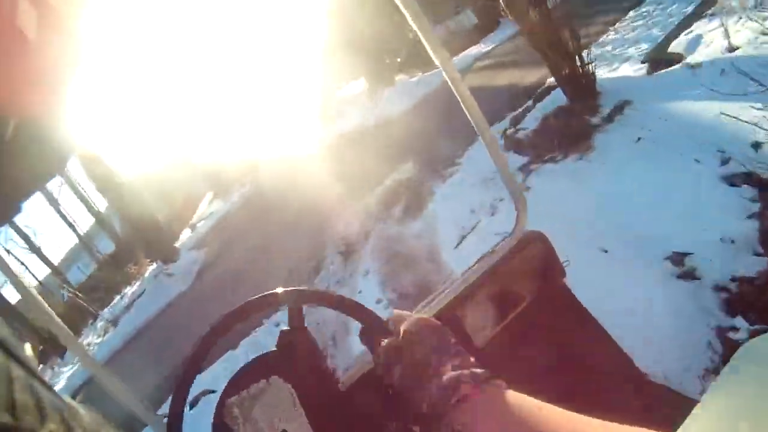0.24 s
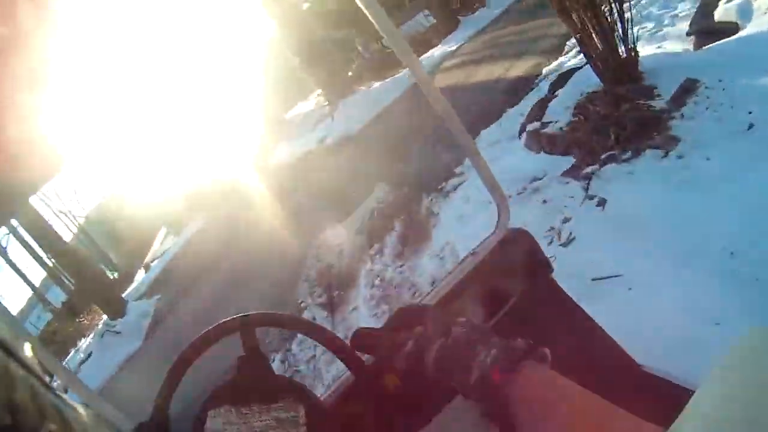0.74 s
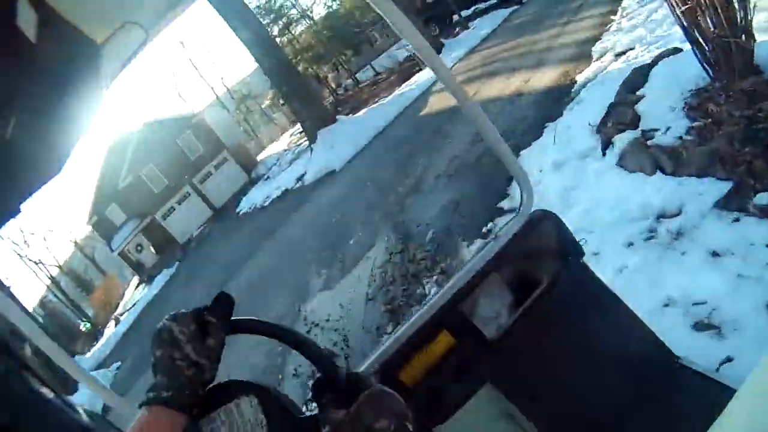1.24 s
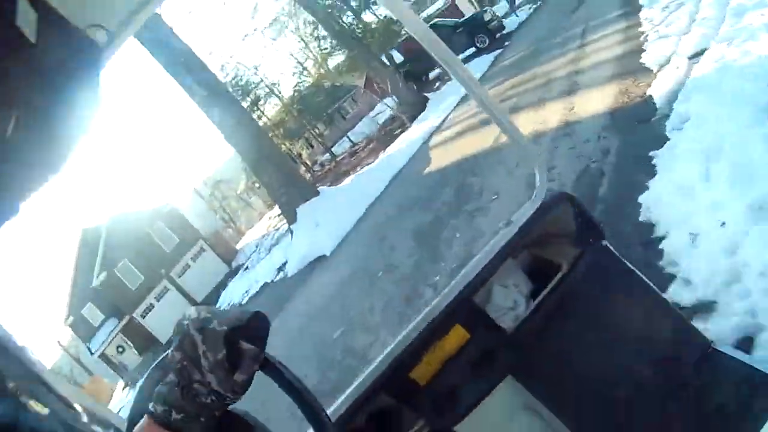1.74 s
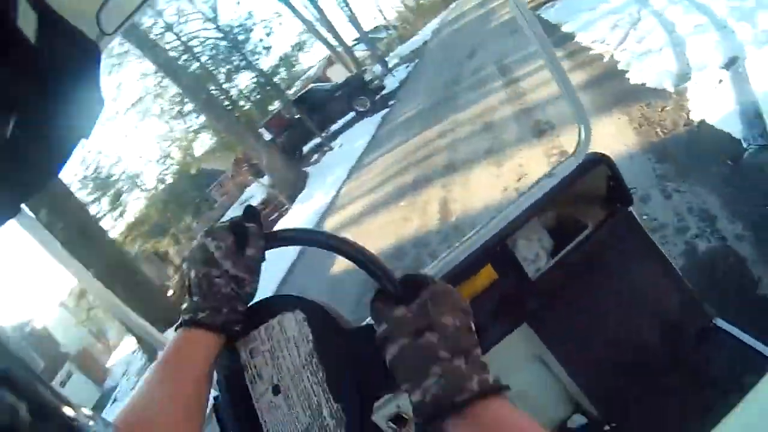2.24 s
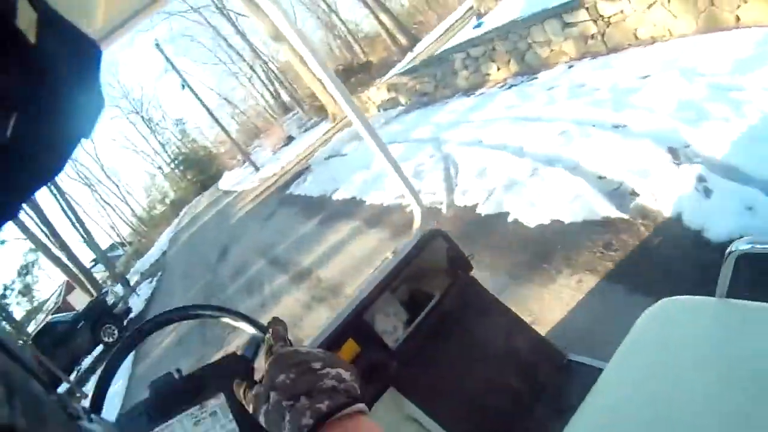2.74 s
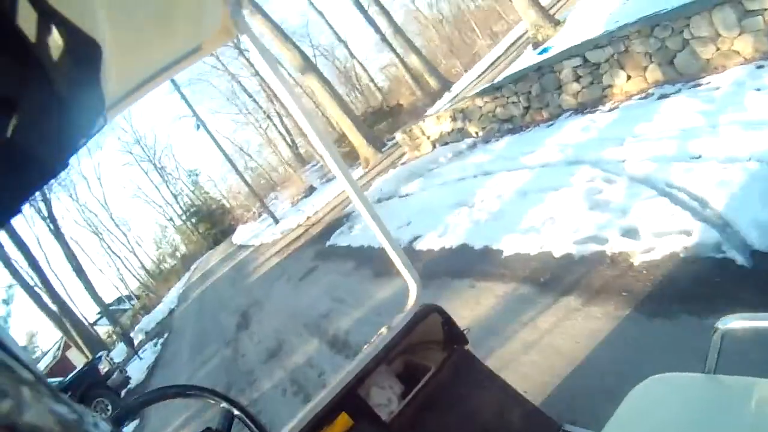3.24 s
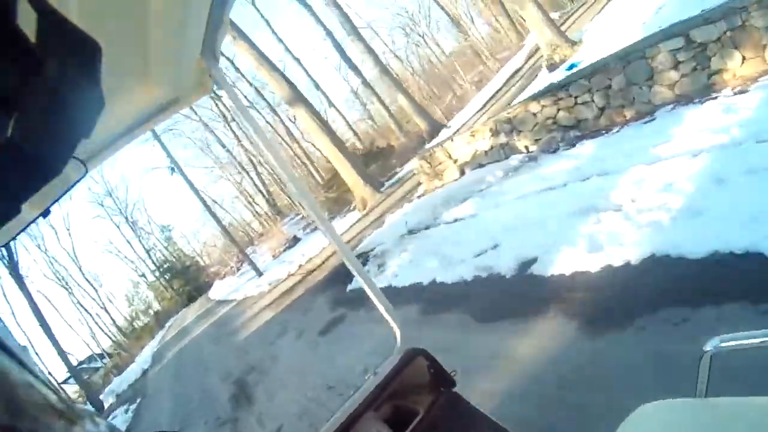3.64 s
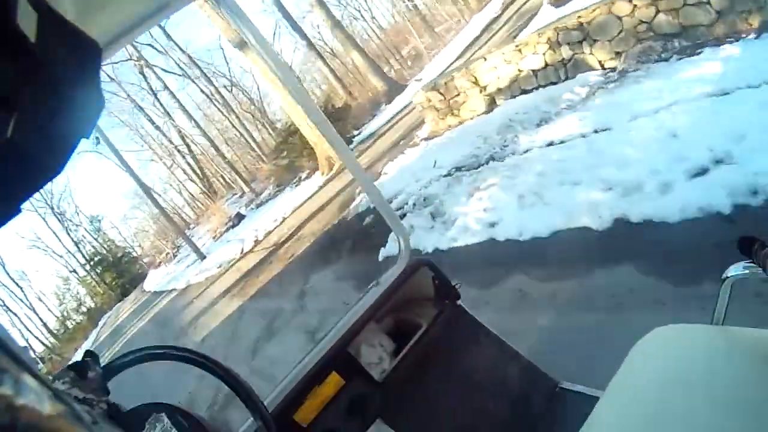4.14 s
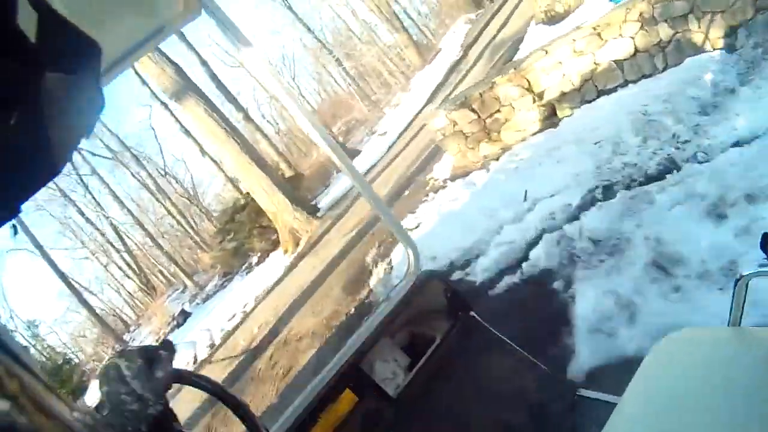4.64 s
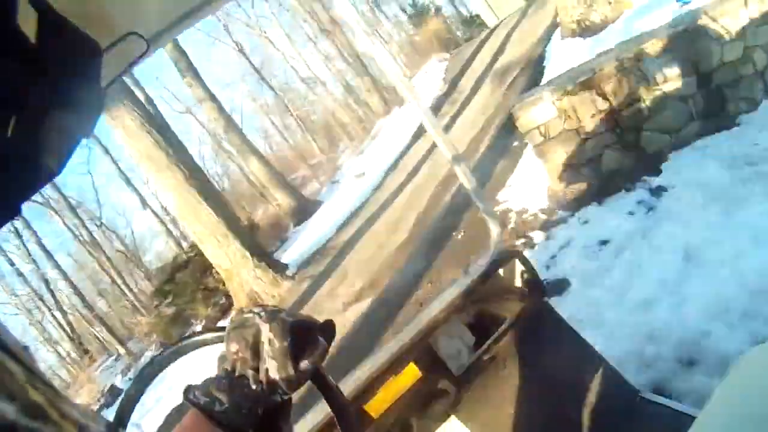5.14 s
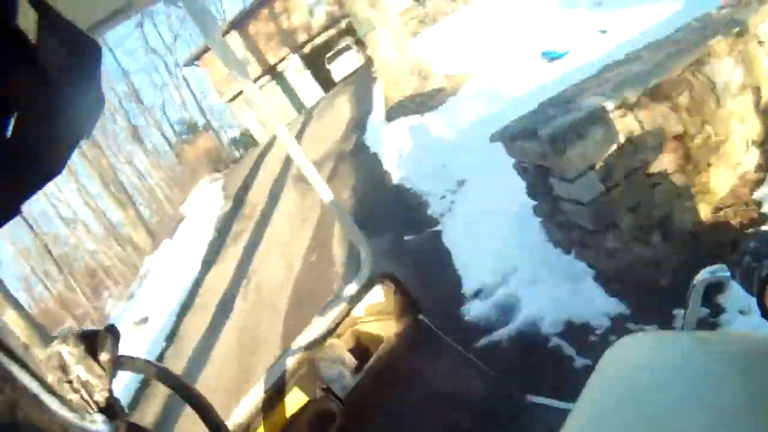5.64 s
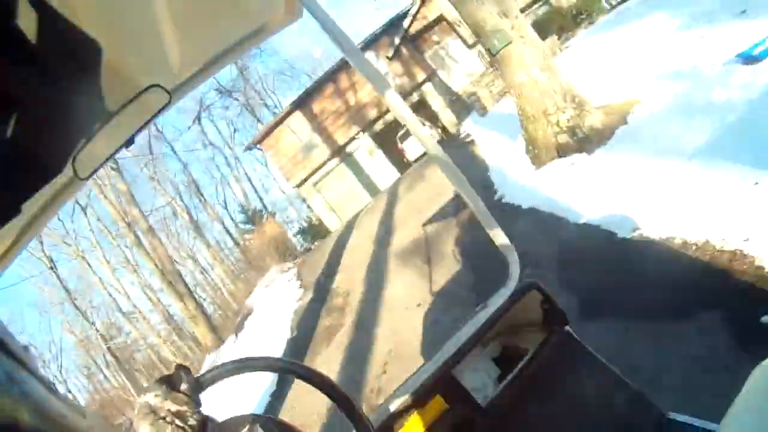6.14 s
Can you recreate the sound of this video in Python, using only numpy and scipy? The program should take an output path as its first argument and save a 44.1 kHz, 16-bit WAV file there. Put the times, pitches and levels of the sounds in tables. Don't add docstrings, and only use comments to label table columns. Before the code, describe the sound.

A small one-cylinder cart idles with slow, soft thumps, then the throttle opens and it pulls away along a driveway, shuddering and clattering. The engine eases briefly, picks up again and chugs on with uneven revs. Hard body knocks mark bumps. The muffled, cased microphone rides on board outdoors, and wind grows from almost nothing to heavy buffeting that breaks into overload.

```python
import sys
import numpy as np
from scipy import signal
from scipy.io import wavfile

SR = 44100
rng = np.random.default_rng(int(sys.argv[2]) if len(sys.argv) > 2 else 0)


def decibels_to_gain(level_db):
    exponent = np.asarray(level_db, float) / 20
    return 10 ** exponent


def store_pcm(level_fs):
    pcm = np.round(np.clip(level_fs, -1, 1) * 32767).astype(np.int16)
    wavfile.write(sys.argv[1], SR, np.atleast_2d(pcm).T)


N = 281799

# time in seconds, firing cycles per second.
CRANK_SPEED = [(0.0, 14.47), (0.32, 13.82), (0.96, 17.19), (1.28, 22.01), (1.44, 23.82), (1.76, 22.78),
               (2.08, 18.47), (2.4, 22.46), (2.72, 20.71), (3.52, 24.29), (3.68, 23.91), (3.84, 20.31),
               (4.16, 19.58), (4.96, 22.75), (5.28, 18.2), (5.76, 22.82), (5.92, 21.76), (6.39, 23.45)]
# time in seconds, peak level in dB.
THROTTLE_CURVE = [(0, -34), (.3, -34), (.56, -31), (.6, -22.5), (.97, -20), (1.05, -15), (1.55, -19.5),
                  (1.72, -25.5), (2.04, -26), (2.1, -15.5), (2.55, -18.5), (2.75, -18), (3.4, -17),
                  (3.8, -22), (4.9, -17.5), (5.25, -17), (5.6, -17), (6.39, -12.5)]
# frequency in Hz, width in Hz, level in dB.
BODY_MODES = [(380, 29, 8), (450, 89, 0), (742, 32.4, 6.5), (919, 35, 0.5), (1154, 185, -2.5),
              (1970, 200, -1.5), (2248, 166, 3.5), (2870, 600, -8)]
# frequency in Hz, density in dB per Hz.
GEAR_SPECTRUM = [(210, -28.5), (350, 1.5), (441, -5.5), (488, -3), (755, -1.5), (836, -5.5), (1180, -14.5),
                 (1700, -12), (2230, -9), (3200, -21.5), (4160, -51.5), (7040, -120)]
# frequency in Hz, width in Hz, level in dB.
METAL_LEAK = [(3640, 750, -25.5), (4670, 770, -29.5), (5220, 2400, -38), (9550, 600, -48.5)]
# middle in seconds, length in seconds, extra clatter in dB.
GRIT_PATCHES = [
    (0.0, 0.4, 3),
    (1.498, 0.2, 0.5),
    (2.136, 0.24, 4),
    (2.938, .15, -1),
    (3.851, 0.67, -2.5),
    (4.604, 0.2, 2),
    (5.367, 0.8, 1.5),
]
# peak time in seconds, peak in dB, low thud and bright tick in dB relative to it.
BODY_KNOCKS = [(0.1082, -29, -19, -38), (0.3181, -33.5, 5, -27.5), (1.0265, -18, -9, -36.5),
               (1.0324, -22, -10, -42), (1.102, -34, -4, -24), (1.157, -23.5, -25, -28),
               (1.299, -25, -10, -29), (1.662, -26, -12, -47), (1.6868, -25, 10, -37),
               (1.718, -34, 7, -19.5), (1.926, -16, -12, -33), (1.955, -20, 6, -35.5),
               (2.0518, -28.5, 3, -18), (2.1037, -14.5, -24, -34), (2.2264, -26, 4, -32.5),
               (2.3098, -24, 1, -28), (2.7774, -30, 2.5, -27.5), (3.0879, -31.5, -1, -36),
               (3.6665, -37.5, 8, -30), (4.3934, -42, -5.5, -43), (4.5975, -20.5, 12, -23),
               (4.8321, -24, 5, -46.5), (5.0602, -23.5, 15, -22), (5.2448, -19.5, -9, -33.5),
               (5.3541, -16.5, -12, -33.5), (5.3604, -18, 2.5, -35), (5.8067, -25, 8, -34),
               (5.9603, -22, 11, -33)]
# time in seconds, level in dB.
ROAD_WIND = [(0, -69), (.5, -51.5), (.95, -42.5), (1.5, -30.5), (2.0, -37), (2.6, -28), (3.6, -27.5),
             (5.2, -25.5), (5.45, -34.5), (6.39, -18)]
# frequency in Hz, density in dB per Hz.
FLUTTER_SPECTRUM = [(65, -29), (110, -2.5), (184, 1), (214, -2.5), (247, -4), (315, -5.5), (453, -9),
                    (1380, -31), (1800, -37.5), (2340, -59.5), (3960, -120)]
# middle in seconds, peak in dB, length in seconds, deep part in dB relative to the peak.
WIND_GUSTS = [(1.168, -51, 0.19, 7), (1.565, -39, 0.18, 5), (1.756, -54, 0.023, 18),
              (1.954, -26, 0.031, -9), (2.305, -20.5, .045, -10), (2.467, -26.5, 0.038, 3),
              (2.589, -22, 0.088, -10.5), (2.772, -21, 0.053, -3), (3.077, -25, 0.061, -2),
              (3.41, -22.5, 0.11, -16), (3.524, -24.5, 0.045, 9), (3.627, -23, 0.13, -11),
              (3.816, -26.5, 0.054, 0.5), (3.909, -20.5, 0.028, -6.5), (4.011, -21.5, 0.072, 4.5),
              (4.204, -20, .04, -12), (4.33, -26.5, 0.075, -1), (4.457, -16.5, .04, -11),
              (4.599, -20, 0.052, 6.5), (4.763, -21.5, 0.065, -5.5), (4.87, -23, .03, 0.5),
              (4.962, -17, 0.071, -9.5), (5.086, -16.5, 0.05, -6), (5.161, -16, 0.017, -4),
              (5.257, -24, 0.021, 7.5), (5.378, -37, 0.07, 10.5), (5.571, -26, 0.057, -1),
              (5.675, -35.5, 0.082, 13), (5.82, -40.5, .07, 11.5), (6.139, -31, 0.056, 17)]
# time in seconds, edge level in dB.
OVERLOAD_SLAPS = [(2.659, -59), (2.7784, -47), (3.079, -54), (3.4635, -49.5), (3.5249, -39.5),
                  (3.5616, -45.5), (3.652, -58), (3.9372, -34), (3.9655, -40), (4.056, -45), (4.4294, -58),
                  (4.4568, -45.5), (4.5347, -47.5), (4.602, -32.5), (4.8609, -49.5), (4.8885, -53.5),
                  (4.9168, -44), (4.948, -49.5), (4.9875, -49), (5.0041, -46.5), (5.0636, -46),
                  (5.0853, -49), (5.1334, -54), (5.153, -51), (5.217, -43.5), (6.0816, -45), (6.1114, -53),
                  (6.1567, -39), (6.3013, -56.5), (6.3453, -42.5)]

FIRST_STROKE, EXHAUST_LAG = .79, .325
GRIP_CYCLES, RUNNING_CYCLES = 17.7, 22.65
SHUDDER_S, SHUDDER_LENGTH_S = 1.3, .3
OVERLOAD = .362


def engine(crank):
    cycles_per_s = np.gradient(crank) * SR
    exhaust_db, = in_time(THROTTLE_CURVE)
    idle_gulp = decibels_to_gain(-29.0) + decibels_to_gain(exhaust_db - 3.0)
    pulling_gulp = (decibels_to_gain(-32) + decibels_to_gain(exhaust_db - 5.5)) * decibels_to_gain(1 * drift(8.3))
    intake_db = 20 * np.log10(np.where(cycles_per_s < GRIP_CYCLES, idle_gulp, pulling_gulp))
    intake = thumps(crank, intake_db, hz=155, width_hz=234)
    exhaust = thumps(crank - EXHAUST_LAG, exhaust_db, hz=129, width_hz=200)

    clutch = np.clip((cycles_per_s - 17) / 3, 0, 1)
    shake = sum(decibels_to_gain(db) * np.sin(2 * np.pi * order * crank) for order, db in [(2, -22), (3, -13.5)])
    shake = shake * decibels_to_gain(4.0 * bump(SHUDDER_S, SHUDDER_LENGTH_S))
    pipe_gain = decibels_to_gain(-14.5 + 5.5 * drift(18) - 3.5 * bump(1.02, .35))
    pipe_pulse = 1 + 0.51 * np.cos(2 * np.pi * (crank - 0.2))
    pipe = pipe_gain * pipe_pulse * np.cos(2 * np.pi * 6 * crank)
    idling = decibels_to_gain(-43.0) * np.sin(2 * np.pi * 5 * (crank + .05))
    valve = valve_knock(crank - EXHAUST_LAG, exhaust_db - 2.0)
    loaded = clutch * (valve + decibels_to_gain(exhaust_db) * (shake + pipe))
    return band(intake + exhaust, 55, 380) + loaded + idling


def thumps(crank, level_db, hz, width_hz):
    at = np.flatnonzero(np.diff(np.floor(crank)) > 0)
    puffs = np.zeros(N)
    puffs[at] = decibels_to_gain(level_db[at] + 1.2 * rng.standard_normal(len(at)))
    s = np.arange(-2000, 2001) / SR
    shape = np.cos(2 * np.pi * hz * s) * np.exp(-(width_hz * s) ** 2)
    window = np.hanning(len(s))
    shape = shape - shape.sum() / window.sum() * window
    swell = np.exp(-s / 0.0056) * (1 - np.exp(-s / 0.009)) * (s > 0)
    ring = -np.sin(2 * np.pi * hz * .9 * s) * swell
    return signal.fftconvolve(puffs, shape + 0.12 * ring, "same")


def valve_knock(crank, level_db):
    clicks = np.diff(np.floor(crank), prepend=0) * decibels_to_gain(level_db)
    return sum(decibels_to_gain(db) * resonance(resonance(clicks, hz, width), hz, width)
               for hz, width, db in [(356, 61, 37.6), (758, 64, 34.6)])


def clatter(crank):
    cycles_per_s = np.gradient(crank) * SR
    faster = cycles_per_s - RUNNING_CYCLES
    belt_db = 3.5 * (np.clip((cycles_per_s - GRIP_CYCLES) * 2, 0, 1) - 1)
    grit_db = sum(db * bump(s, length) for s, length, db in GRIT_PATCHES)
    level_db = -39.5 + 0.75 * faster + grit_db + belt_db

    pulsed = np.clip(0.34 + 0.021 * faster + .4 * bump(SHUDDER_S, SHUDDER_LENGTH_S), 0, 1)
    since = (crank - EXHAUST_LAG - .08) % 1
    burst = rms_one(np.exp(-since / 0.61) + 0.5 * np.exp(-((since + .5) % 1) / 0.053))
    gate = (1 - pulsed) + pulsed * burst * decibels_to_gain(1.3 * drift(12))

    hardness = decibels_to_gain(5.0 * np.minimum(rng.exponential(1, N), 4))
    ticks = (rng.random(N) < 160 / SR) * hardness * rng.choice([-1, 1], N)
    rattle, *metal = gate * rng.standard_normal((1 + len(METAL_LEAK), N))
    peaks = rms_one(body(rattle + 3.55 * ticks))
    broad = gate * coloured(GEAR_SPECTRUM, 1.4 * drift(4.2), patchy_db=0.5, rate=13)
    thin = 0
    for noise, (hz, width, db) in zip(metal, METAL_LEAK):
        ringing = resonance(resonance(noise, hz, width), hz, width)
        thin = thin + decibels_to_gain(db + 0.04 * faster + 1.0 * drift(4.2)) * ringing
    cased = muffled(decibels_to_gain(4.0) * peaks + decibels_to_gain(2.5) * broad, cut_hz=3110)
    return decibels_to_gain(level_db) * (cased + decibels_to_gain(18.5) * thin)


def knocks():
    crack, thud, tick = np.zeros((3, N))
    s = np.arange(2000) / SR
    noise = rng.standard_normal((len(BODY_KNOCKS), 2, 2000))
    for (when, db, low_db, high_db), (bright, dull) in zip(BODY_KNOCKS, noise):
        at = round((when - .0025) * SR)
        contact = np.where(s == 0, 9.0, bright)
        crack[at:at + 2000] += decibels_to_gain(db) * contact * np.exp(-s / 0.0094)
        tick[at:at + 2000] += decibels_to_gain(db + high_db) * contact * np.exp(-s / 0.01)
        thud[at:at + 2000] += decibels_to_gain(db + min(low_db, 3)) * dull * np.exp(-s / 0.0068)
    ring = decibels_to_gain(2.5) * body(crack) + decibels_to_gain(-5.5) * band(crack, 800, 2100) + decibels_to_gain(8.5) * band(thud, 200, 1300)
    return muffled(ring, cut_hz=4100) + decibels_to_gain(-6.0) * band(tick, 4600, 11000)


def wind():
    steady = decibels_to_gain(in_time(ROAD_WIND)[0])
    sharp = steady + sum(decibels_to_gain(db) * bump(s, length) for s, db, length, deep_db in WIND_GUSTS)
    deep = sum(decibels_to_gain(db + deep_db) * bump(s, length) for s, db, length, deep_db in WIND_GUSTS)
    lumps_db = 1.2 * drift(14) + 2.2 * drift(50)
    flutter = muffled(coloured(FLUTTER_SPECTRUM, lumps_db, patchy_db=-1.0, rate=12), cut_hz=2500)

    throb_gain = decibels_to_gain(-46) + decibels_to_gain(-5) * (steady + 0.56 * deep)
    buffet_gain = decibels_to_gain(-53) + decibels_to_gain(-16) * steady + decibels_to_gain(-5.0) * deep
    rumble_gain = decibels_to_gain(-52.5) + decibels_to_gain(-22.0) * steady
    throb = throb_gain * band_noise(68, 115)
    buffet = buffet_gain * band_noise(37, 66)
    rumble = rumble_gain * band_noise(23, 33)
    return decibels_to_gain(-1.5) * sharp * flutter + throb + buffet + rumble


def slaps(pressure):
    out = np.zeros(N)
    push = np.hanning(120)
    for when, db in OVERLOAD_SLAPS:
        at = round(when * SR) - 10
        swing = (pressure + out)[at + 60]
        top = OVERLOAD * decibels_to_gain(max(.3 * (db + 58), 0) + .5)
        out[at:at + len(push)] += ((top * np.sign(swing) - swing) * push)[:N - at]
    return out


def body(x):
    peaks = sum((-1) ** k * decibels_to_gain(db) * resonance(x, hz, width) for k, (hz, width, db) in enumerate(BODY_MODES))
    return band(peaks, 170, 6700)


def muffled(x, cut_hz):
    return signal.sosfilt(signal.butter(7, cut_hz, fs=SR, output="sos"), x)


def resonance(x, hz, width_hz):
    r = np.exp(-np.pi * width_hz / SR)
    top = np.array([1, 0, -1]) * (1 - r * r) / 2
    return signal.lfilter(top, [1, -2 * r * np.cos(2 * np.pi * hz / SR), r * r], x)


def coloured(spectrum, together_db, patchy_db, rate):
    hz, db = np.transpose(spectrum)
    white, out = rng.standard_normal((2, N)), 0
    edges = 45 * 2 ** np.arange(0, 8.1, .5)
    for k, (low, high) in enumerate(zip(edges, edges[1:])):
        level_db = np.interp(np.log(low * high) / 2, np.log(hz), db, left=-70, right=-70)
        out = out + decibels_to_gain(level_db + patchy_db * drift(rate)) * band(white[k % 2], low, high)
    return rms_one(out * decibels_to_gain(together_db))


def band(x, low_hz, high_hz, order=2):
    return signal.sosfilt(signal.butter(order, [low_hz, high_hz], "band", fs=SR, output="sos"), x)


def band_noise(low_hz, high_hz):
    return rms_one(band(rng.standard_normal(N), low_hz, high_hz))


def drift(rate):
    r = np.exp(-40 * np.pi * rate / SR)
    slow = signal.lfilter([1], [1, -2 * r, r * r], rng.standard_normal(N // 20 + 2002))[2000:]
    return np.interp(np.arange(N) / 20, np.arange(len(slow)), rms_one(slow))


def bump(middle_s, length_s):
    return np.exp(-((np.arange(N) / SR - middle_s) / length_s) ** 2)


def in_time(rows):
    s, *columns = np.transpose(rows)
    return [np.interp(np.arange(N) / SR, s, c) for c in columns]


def rms_one(x):
    return x / np.sqrt(np.mean(x ** 2) + 1e-20)


def scene():
    crank = np.cumsum(in_time(CRANK_SPEED)[0]) / SR - FIRST_STROKE + 1
    pressure = engine(crank) + clatter(crank) + knocks() + wind()
    return (pressure + slaps(pressure))[None]


def low_pass(x):
    return signal.sosfilt(signal.butter(12, 15830, fs=SR, output="sos"), x)


def record(dry):
    s = np.arange(N) / SR
    fade_out = np.minimum((s[-1] - s) / .0006, 1)
    clipped = np.clip(dry, -OVERLOAD, OVERLOAD) * fade_out
    hiss = decibels_to_gain(-74) * band_noise(3000, 17000)
    beat = 2 * np.pi * 58.0 * s
    throb = 1 + .8 * np.cos(beat) + .4 * np.cos(2 * beat)
    whine = decibels_to_gain(-80.5) * throb * np.sin(2 * np.pi * 15174.5 * s)
    return low_pass(clipped + hiss + whine)


dry = scene()
out = record(dry)
store_pcm(out)
```